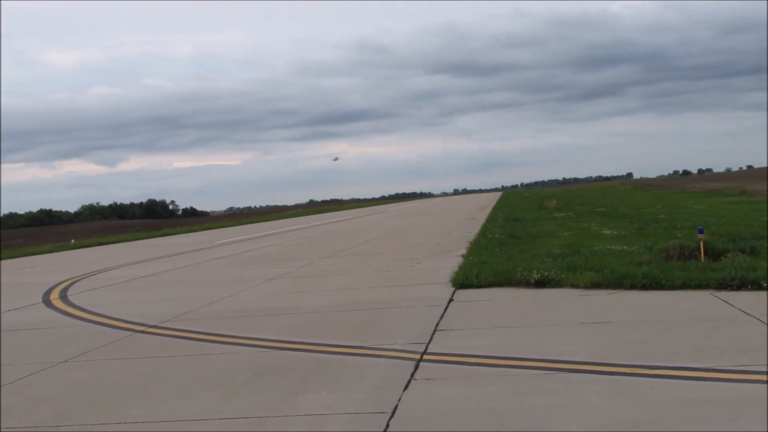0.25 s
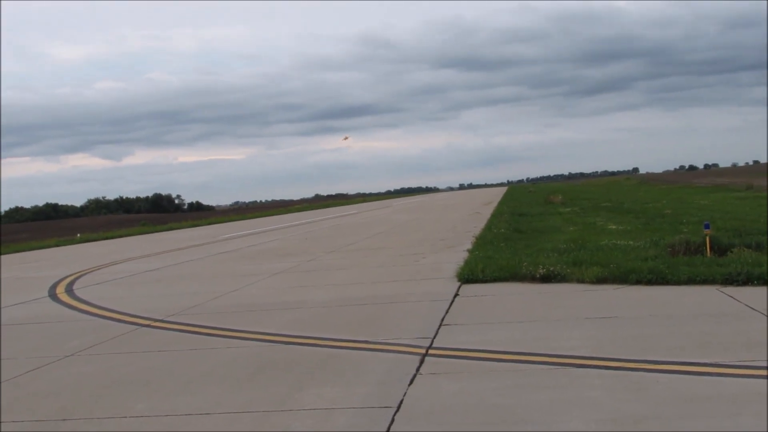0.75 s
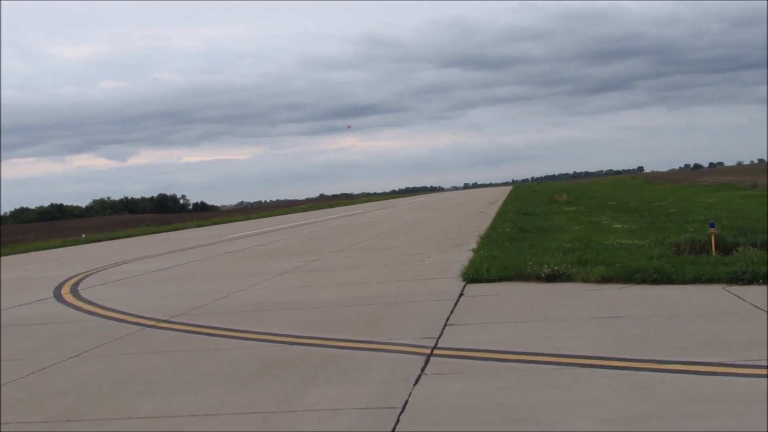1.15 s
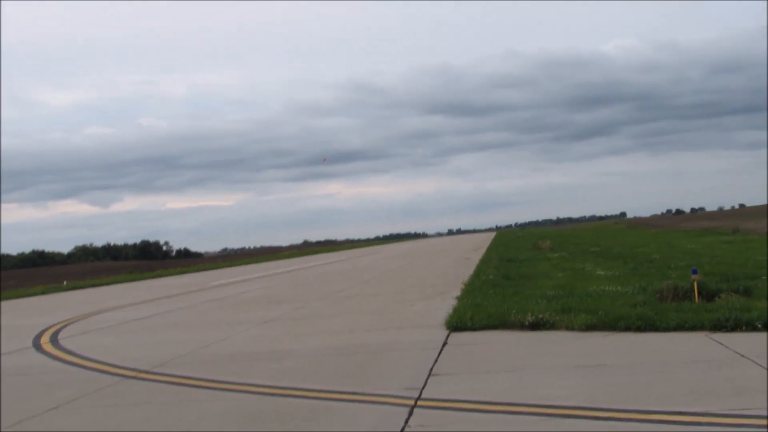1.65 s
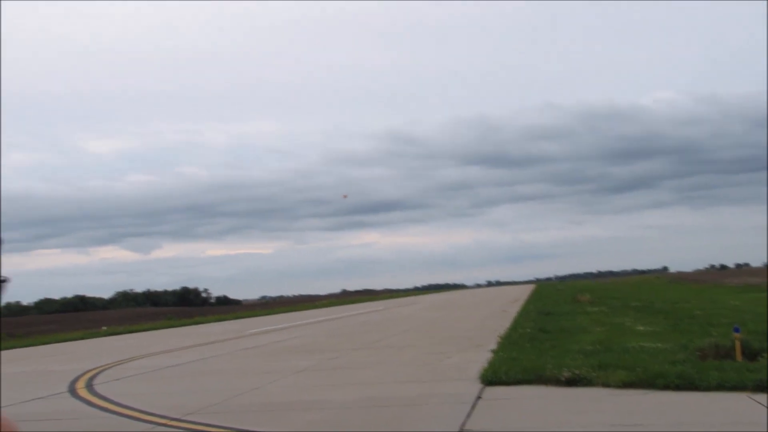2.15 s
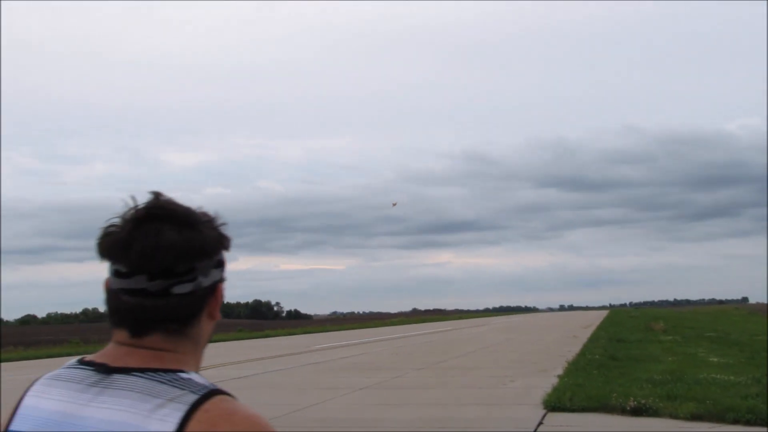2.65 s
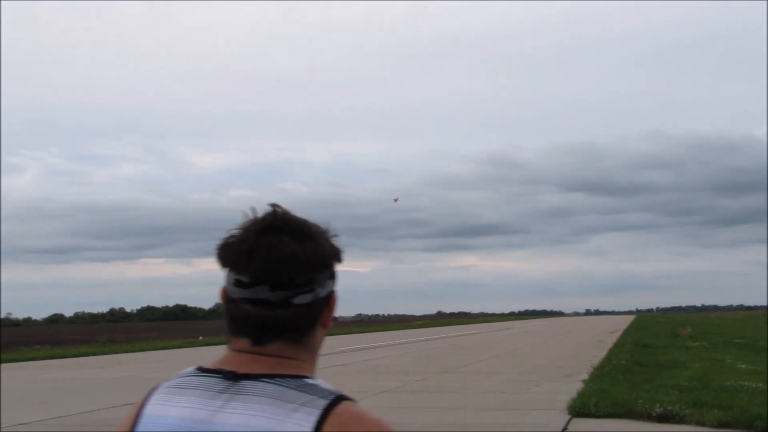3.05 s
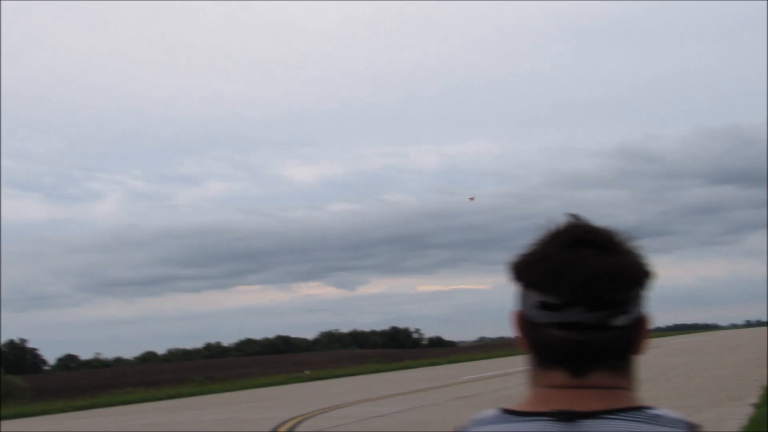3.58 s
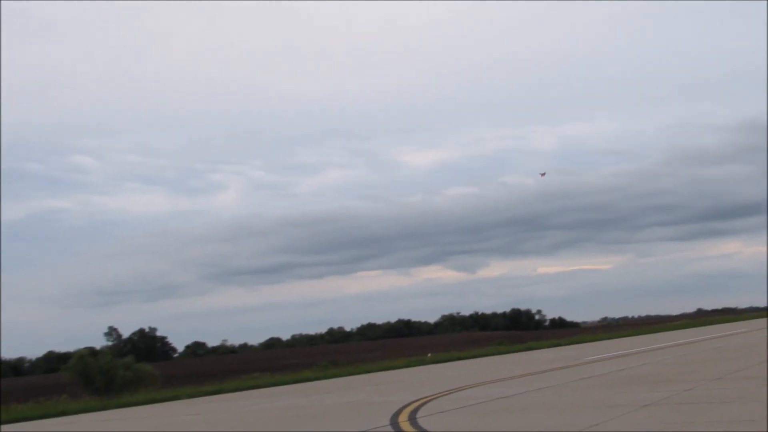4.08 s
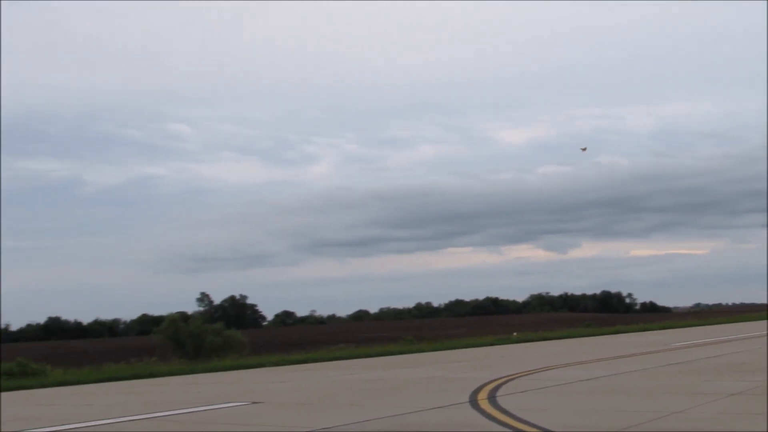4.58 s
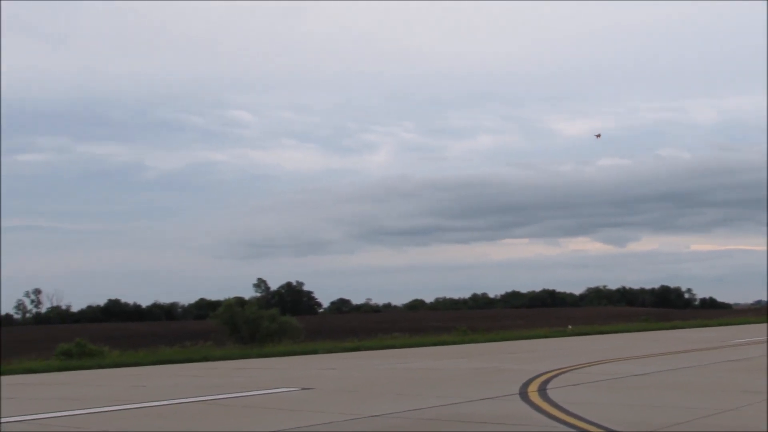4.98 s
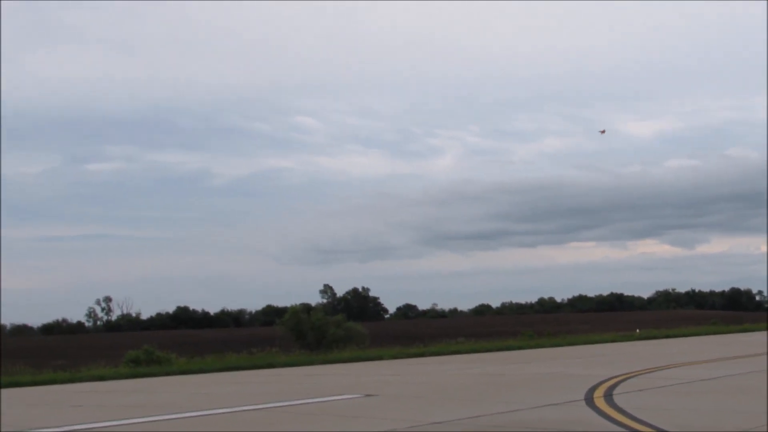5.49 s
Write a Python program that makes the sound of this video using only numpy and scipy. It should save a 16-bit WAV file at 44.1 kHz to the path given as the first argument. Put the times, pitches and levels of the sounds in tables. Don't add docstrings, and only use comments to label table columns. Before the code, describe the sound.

Heavy, clipping wind buffeting nearly covers the hissing roar of a model jet climbing away, with a tiny bird chirping midway.

```python
import sys
import numpy as np
from scipy import signal
from scipy.fft import rfft, irfft, next_fast_len
from scipy.io import wavfile
from scipy.ndimage import uniform_filter1d, map_coordinates

SR = 44100
rng = np.random.default_rng(int(sys.argv[2]) if len(sys.argv) > 2 else 0)


def attenuation_scalar(level_db):
    decades = np.asarray(level_db, float) / 20
    return 10 ** decades


def master_out(mix):
    frames = np.transpose(np.atleast_2d(mix))
    ceiling = np.clip(frames, -1, 1)
    pcm = np.round(ceiling * 32767).astype(np.int16)
    wavfile.write(sys.argv[1], SR, pcm)


N = 252693
T = np.arange(N) / SR
SIZE = next_fast_len(N)
OCTAVE = np.log2(np.maximum(np.fft.rfftfreq(SIZE, 1 / SR), 1))

# (time [s], length [s], first pitch [Hz], last pitch [Hz], level [dB])
CHIRPS = [
    (2.445, 0.019, 4800, 5160, -49),
    (2.5, 0.016, 4200, 3660, -51),
    (2.604, 0.014, 4770, 5330, -55),
    (2.845, 0.046, 7800, 7850, -56),
    (2.89, 0.0085, 7800, 6040, -52),
    (2.913, 0.021, 4940, 5800, -50.5),
    (2.932, 0.013, 6200, 4600, -55),
    (2.95, 0.02, 5370, 4400, -53),
    (3.01, 0.048, 7400, 7700, -56.5),
    (3.056, 0.026, 7540, 6260, -57),
]

# (start [s], hold [s], buffeting [dB], sharpness [dB])
GUSTS = [(0, 0.014, -9, -10.5), (0.087, 0.12, -15.5, -16.5), (0.263, .03, -16, -23),
         (0.372, 0.02, -11, -21.5), (0.479, 0.019, -6.5, -18.5), (0.59, 0.32, -14, -16.5),
         (1.035, 0.017, -11.5, -18), (1.191, 0.059, -8, -18.5), (1.311, 0.11, -16, -8.5),
         (1.497, 0.12, -14, -16), (1.695, 0.0099, -16, -10.5), (1.8, 0.039, -20.5, -22),
         (1.904, 0.039, -18, -17.5), (2.007, 0.023, -16, -24), (2.073, 0.042, -17.5, -13.5),
         (2.162, 0.033, -15, -18), (2.253, 0.018, -17.5, -11), (2.338, 0.095, -13, -18.5),
         (2.509, 0.018, -14, -13.5), (2.607, 0.17, -18, -15), (2.858, 0.004, -16.5, -13),
         (2.93, 0.011, -13, -10), (3.059, 0.069, -18.5, -14.5), (3.173, 0.024, -18.5, -13),
         (3.342, 0.047, -24.5, -4), (3.465, 0.022, -7, -20), (3.535, 0.13, -19.5, -8.5),
         (3.696, .2, -17.5, -12.5), (3.877, 0.013, -15, -13.5), (3.953, 0.36, -15, -12.5),
         (4.454, 0.032, -16, -11), (4.557, 0.022, -24, -14.5), (4.666, 0.027, -17.5, -18.5),
         (4.745, 0.0061, -16, -4), (4.817, 0.056, -16.5, -1), (4.925, 0.031, -13.5, 1.5),
         (5.011, 0.078, -16, -9), (5.213, 0.013, -21, -13.5), (5.305, 0.051, -14, -1.5),
         (5.422, 0.0062, -27.5, 4), (5.455, 0.018, -25.5, -10), (5.518, 0.061, -16, -4),
         (5.654, 0.093, -20, -16)]
# (frequency [Hz], density [dB per Hz])
EDDY_TONE = [(12, -58), (20, -30), (43, -5), (92, 0.5), (160, 0), (265, -6), (422, -11.5), (527, -16.5),
             (684, -37.5), (955, -35.5), (1700, -80), (2210, -70), (3740, -120)]
# (time [s], peak [dB], pitch [Hz], left minus right [dB])
STRONG_EDDIES = [(0.486, -5.5, 170, -3.5), (0.503, -6.0, 120, -1.0), (0.534, -3.0, 301, -4.0),
                 (0.588, -4.5, 162, -3.0), (0.613, -6.5, 141, -1.0), (0.696, -4.0, 230, 0.5),
                 (0.716, -5.5, 171, 0.0), (0.813, -3.5, 197, -0.5), (0.924, -6.5, 194, -4.0),
                 (1.165, -6.5, 129, 2.5), (1.205, -3.0, 143, 2.5), (1.218, -2.0, 212, -3.0),
                 (1.241, -0.5, 236, 2.5), (1.319, -6.0, 244, 3.0), (1.429, -6.5, 171, 3.5),
                 (1.594, -6.0, 159, 3.5), (1.698, -4.5, 157, -3.0), (2.543, 0.5, 169, -2.0),
                 (2.763, -6.5, 179, -2.0), (2.943, -4.0, 218, 0.5), (3.04, -6.5, 137, -3.0),
                 (3.092, -3.0, 179, -0.5), (3.454, -6.0, 132, 0.5), (3.473, -5.0, 213, -3.0),
                 (3.617, -3.0, 215, 2.5), (3.629, -2.0, 152, -1.5), (3.644, -0.5, 241, -2.5),
                 (3.816, -6.5, 149, 1.5), (3.826, -6.0, 181, 0.0), (3.875, -0.5, 195, -2.0),
                 (3.937, -6.5, 191, -0.5), (4.066, -6.0, 177, 1.0), (4.284, -5.5, 177, -3.5),
                 (4.352, -6.0, 221, 4.5), (4.453, -7.0, 235, 1.5), (4.677, -7.0, 124, -0.5),
                 (4.754, -6.0, 201, -3.0), (4.818, -1.5, 165, 0.0), (4.846, -6.0, 209, -1.5),
                 (4.941, -5.5, 332, 1.5), (4.956, -1.5, 251, -2.5), (4.967, -5.5, 219, -1.0),
                 (4.986, -6.5, 251, -1.5), (5.066, -5.5, 207, 0.5), (5.077, -6.5, 200, 3.5),
                 (5.28, -4.5, 293, 1.0), (5.307, -5.0, 300, 2.5), (5.536, -5.0, 141, -1.5),
                 (5.581, 0.5, 154, 1.0), (5.614, -5.5, 168, -1.0)]
# (time [s], peak [dB], pitch [Hz])
LESSER_EDDIES = [(0.114, -8.0, 147), (0.157, -9.0, 139), (0.184, -9.5, 254), (0.212, -10.5, 142),
                 (0.361, -9.5, 156), (0.384, -7.0, 175), (0.473, -7.0, 214), (0.543, -8.5, 196),
                 (0.627, -7.0, 154), (0.802, -8.5, 145), (0.834, -7.5, 130), (0.898, -8.5, 153),
                 (0.94, -9.0, 149), (0.958, -10.0, 173), (0.97, -10.5, 155), (1.043, -7.5, 174),
                 (1.228, -7.5, 182), (1.299, -7.0, 145), (1.535, -7.5, 209), (1.571, -7.0, 216),
                 (1.583, -8.0, 154), (1.61, -7.0, 272), (1.68, -8.5, 170), (1.906, -11.5, 213),
                 (2.091, -9.0, 192), (2.159, -10.5, 229), (2.251, -11.5, 260), (2.267, -9.5, 202),
                 (2.279, -11.5, 226), (2.34, -8.0, 211), (2.438, -8.0, 163), (2.459, -7.5, 160),
                 (2.562, -8.0, 214), (2.849, -9.0, 167), (2.862, -10.5, 352), (3.122, -10.5, 205),
                 (3.205, -10.0, 205), (3.345, -11.5, 152), (3.412, -11.5, 198), (3.484, -7.5, 158),
                 (3.498, -7.5, 168), (3.594, -8.0, 171), (3.687, -8.5, 211), (3.778, -8.0, 191),
                 (3.802, -7.5, 249), (3.841, -8.5, 191), (3.959, -8.5, 175), (4.023, -9.0, 173),
                 (4.184, -8.0, 194), (4.228, -7.5, 292), (4.492, -7.0, 155), (4.742, -9.0, 234),
                 (4.799, -7.0, 180), (4.836, -7.5, 179), (4.904, -9.0, 208), (5.257, -7.0, 159),
                 (5.32, -7.5, 176), (5.345, -8.5, 192), (5.418, -9.0, 250), (5.555, -7.5, 144)]
# (time [s], peak [dB], pitch [Hz])
SHARED_EDDIES = [(0.021, -20.5, 252), (0.215, -21.0, 201), (0.392, -20.5, 195), (0.468, -20.5, 221),
                 (0.486, -17.0, 120), (0.498, -19.5, 146), (0.521, -20.5, 146), (0.534, -15.0, 360),
                 (0.587, -20.0, 125), (0.601, -19.5, 166), (0.711, -20.0, 310), (0.777, -21.0, 148),
                 (0.814, -20.5, 233), (0.899, -21.5, 141), (0.924, -19.5, 182), (0.94, -20.5, 140),
                 (1.029, -18.0, 141), (1.206, -19.0, 158), (1.219, -16.5, 235), (1.241, -16.0, 228),
                 (1.3, -20.0, 162), (1.317, -15.5, 218), (1.422, -20.0, 224), (1.594, -18.0, 139),
                 (1.608, -21.0, 276), (1.681, -20.0, 184), (1.698, -19.0, 258), (2.544, -17.0, 146),
                 (2.86, -17.5, 171), (2.94, -21.0, 163), (3.039, -21.0, 146), (3.453, -19.5, 149),
                 (3.473, -15.5, 162), (3.487, -16.5, 183), (3.567, -19.5, 124), (3.598, -17.5, 170),
                 (3.616, -17.0, 234), (3.644, -16.5, 206), (3.728, -21.0, 120), (3.875, -18.5, 211),
                 (4.088, -19.5, 158), (4.233, -21.0, 227), (4.286, -19.5, 152), (4.351, -16.5, 191),
                 (4.754, -21.0, 249), (4.794, -21.5, 206), (4.822, -13.0, 201), (4.853, -19.0, 208),
                 (4.942, -15.5, 160), (4.956, -17.5, 369), (4.969, -18.0, 255), (5.077, -20.5, 218),
                 (5.278, -19.0, 256), (5.289, -21.0, 266), (5.307, -18.0, 175), (5.322, -20.0, 140),
                 (5.528, -14.0, 205), (5.572, -20.0, 147), (5.586, -19.5, 151), (5.615, -21.0, 186)]
# (time [s], peak [dB], pitch [Hz])
SNAPS = [
    (1.424, -42, 930),
    (3.975, -35, 880),
    (4.823, -30.5, 890),
    (4.857, -33, 1330),
    (5.29, -36, 1090),
    (5.533, -32, 895),
    (5.579, -31.5, 1170),
]
WIDEN_DB = 11.5
RISE_DB_PER_S, FALL_DB_PER_S, LULL_DB, LULL_SHARP_DB = 252, 160, -27, -42
FLICK_PAN_DB = 6
LEAN_SHARE = 0.46
SHARED_DB, SHARED_CALM = -2, 6.9
WAKE, WAKE_S = 5.6, 0.013

# (time [s], roar [dB], top treble lost to distance and bearing [dB])
FLIGHT = [(0, -40.5, 3), (.3, -42, 1.5), (.55, -42, 5), (.8, -45.5, 7.5), (1.3, -46, 14),
          (1.6, -47.5, 12.5), (1.85, -50, 8.5), (2.15, -49.5, 5.5), (2.5, -47.5, 2), (2.72, -50, 4.5),
          (3.15, -48, 8), (3.45, -44.5, 24), (3.95, -53, 18), (4.35, -45.5, 29), (4.85, -45, 31.5),
          (5.03, -49, 22), (5.38, -48.5, 26.5), (5.73, -48.5, 27.5)]
# (time [s], lag [ms], strength [dB])
RUNWAY_ECHO = [(0.0, 0.68, -10), (0.5, 0.71, 1.5), (0.88, 0.85, 1.5), (1.07, 0.93, 0), (1.3, 1.02, 1.5),
               (1.5, 1.11, 0.5), (1.76, 1.096, 0.5), (2.2, 1.19, 1.5), (2.45, 1.205, 2), (2.7, 1.26, -1.5),
               (3.09, 1.31, -2.5), (3.53, 1.428, 2.4), (3.97, 1.42, -3.5), (4.41, 1.35, -1.5),
               (4.85, 1.43, -1.5), (5.15, 1.54, -6.5), (5.73, 1.71, -5.5)]
# (time [s], pitch [Hz], level over roar [dB])
BLADE_WHISTLE = [(0, 14980, -33), (.1, 14960, -34), (.21, 14830, -34), (.33, 14500, -33), (.47, 14080, -33),
                 (.6, 13920, -38), (.8, 13750, -39), (1.1, 13690, -37), (1.5, 13680, -34),
                 (2.5, 13670, -35), (3.3, 13700, -43), (3.8, 13700, -70)]
# (frequency [Hz], density [dB per Hz])
ROAR_TONE = [(60, -41.0), (250, 5.5)] + [(350, -34), (600, -1.5), (687, -13.5), (765, -2.5), (1000, -4.0),
             (1280, 3.0), (1540, -2.5), (1740, 1.5), (1985, -2.0), (2400, -5.0), (3100, -7.5), (3480, -18),
             (4100, -16.5), (4600, -21.0), (5610, -18.5), (6600, -23.0), (7800, -26), (9200, -28.0),
             (10200, -34), (10800, -37), (15000, -52.0)][1:]
# (frequency [Hz], side over mid [dB])
ROAR_WIDTH = [(200, -26), (800, -16), (1500, -15.5), (1750, -19.5), (2400, -13.5), (4400, -12.5),
              (8000, -9.5), (15000, -4)]
# (time [s], half length [s], level [dB])
STILL_AIR = [(0.082, 0.15, 3), (1.11, 0.063, 0.5), (1.42, 0.33, 6), (2.263, 0.013, 4), (2.696, 0.048, 3),
             (2.905, 0.039, 0), (3.1, 0.031, 3), (3.53, 0.066, 6.5), (3.813, 0.075, 8.5), (4.393, 0.2, 7.5),
             (4.942, 0.033, 11), (4.165, 0.092, 3.5), (5.253, 0.085, 2), (5.432, 0.02, 7.5),
             (5.561, 0.0087, 6.5)]
# (time [s], takes [s], change [dB])
NOZZLE_TURNS = [
    (1.25, .2, 1.5),
    (3.2, 0.16, -1.5),
    (4.15, 0.092, -12),
    (4.85, 0.1, 7),
]
# (from [s], to [s], pitch [Hz], width [octaves], change [dB])
ROAR_TINTS = [
    (0.1, .55, 5700, 0.059, 2.5),
    (1.28, 2, 2380, 0.038, -9),
    (1.28, 1.2, 3550, .04, -7),
    (1, 1.2, 12000, .2, 3.5),
    (2.5, 4.98, 2600, 0.34, 3.),
    (3.2, 3.7, 1330, .12, 1.5),
    (4, 4.3, 3240, 0.059, 4.5),
    (-1, 3.8, 2100, 0.041, 4),
    (5, 5.8, 1970, .06, 5),
]
# (time [s], change [dB], recovery [s])
DUCKS = [
    (.56, -3, 0.36),
    (1.236, -9, 0.75),
    (3.65, -2, 1),
    (5.6, -9, 0.27),
]
DUCK_S = 0.015
BODY_MS, BODY_DB = 0.99, -20
HISS_DB, HISS_SHARE = -4, 0.47
LOW_DB, LOW_SHARE = 3.5, 0.21
ECHO_DB, OVER_GRASS_DB, OVER_GRASS_S = -4., -6., .8
REAR_HZ, REAR_OCTAVES, REAR_S, REAR_TAKES_S, REAR_DB = 2048, .15, 4.83, 0.44, 4.5
TINT_TAKES_S = 0.062

# (frequency [Hz], level over mean hiss [dB])
DROPOUT_FLOOR = [(1000, -6), (3000, -2.5), (6000, -3), (9000, -9.5), (10200, -9.5), (10700, -17.5),
                 (11400, -11), (12100, -11), (16000, -13)]
SCAN_HZ, SCAN_DB = 15735, -98


def ramp(x):
    return np.clip(x, 0, 1)


def bell(x):
    return np.exp(-.5 * x ** 2)


def colour(x, points):
    hz, db = np.transpose(points)
    return irfft(rfft(x, SIZE) * attenuation_scalar(np.interp(OCTAVE, np.log2(hz), db)), SIZE)[:N]


def curves(table):
    s, *columns = np.transpose(table)
    return [np.interp(T, s, c) for c in columns]


def unit(x):
    return x / np.sqrt(np.mean(x ** 2))


def walk(rate):
    k = int(SR / rate)
    held = np.repeat(rng.standard_normal(N // 100), k)[:N]
    return unit(uniform_filter1d(uniform_filter1d(held, k), k))


def split(x, hz):
    low = signal.sosfiltfilt(signal.butter(2, hz, fs=SR, output="sos"), x)
    return low, x - low


def delay(x, ms):
    return map_coordinates(x, [np.arange(N) - ms * SR / 1000], order=3, mode="wrap")


def scan_whine():
    level_db = SCAN_DB - 6 * ramp(4.2 - T) + 3 * walk(12)
    return attenuation_scalar(level_db) * np.sin(2 * np.pi * SCAN_HZ * T)


def bird(lean=0.48):
    out = np.zeros(N)
    for s, length, first_hz, last_hz, db in CHIRPS:
        t = np.arange(int(length * SR)) / SR
        warble_hz = 150 * np.sin(2 * np.pi * 90 * t)
        hz = first_hz + (last_hz - first_hz) * t / length + warble_hz
        tone = np.sin(2 * np.pi * np.cumsum(hz) / SR)
        out[int(s * SR):][:len(t)] += attenuation_scalar(db - 0.5) * np.hanning(len(t)) ** .5 * tone
    return out * np.array([[1], [lean]])


def gusts():
    power = attenuation_scalar(LULL_DB) ** 2
    sharp = power * LULL_SHARP_DB
    for s, hold, db, sharp_db in GUSTS:
        rise_db = RISE_DB_PER_S * np.maximum(s - T, 0)
        fall_db = FALL_DB_PER_S * np.maximum(T - s - hold, 0)
        push = attenuation_scalar(db - rise_db - fall_db) ** 2
        power = power + push
        sharp = sharp + push * sharp_db
    return 10 * np.log10(power), sharp / power


def port_flutter(sharp_db):
    low, high = split(unit(colour(rng.standard_normal(N), EDDY_TONE)), 210.0)
    deep, low = split(low, 98.0)
    high, spit = split(high, 483.0)
    spit = spit * attenuation_scalar(8.5 * np.tanh(0.84 * walk(170)) - 6.0)
    clump_db = 6 * np.tanh((1.0 * walk(35) + 4.6 * walk(90)) / 6)
    sharp = attenuation_scalar(1.48 * (sharp_db + 13.0) + 3.19 * clump_db - 0.5)
    large = attenuation_scalar(0.072 * clump_db) * deep + attenuation_scalar(clump_db - 3.0) * low
    return large + split(sharp * high, 565.0)[0] + sharp * spit


def buffet():
    gust_db, sharp_db = gusts()
    left, right = [attenuation_scalar(port_db) * port_flutter(sharp_db) for port_db in (-1.4, 0.)]
    wind = np.array([attenuation_scalar(-WIDEN_DB - 0.5) * (left + right), left - right]) * attenuation_scalar(gust_db - 6.5)
    size = uniform_filter1d(abs(signal.hilbert(wind[1], SIZE)[:N]), size=200)
    both = uniform_filter1d(abs(wind[0]), size=300)
    wind = wind / np.array([1 + (both / 0.071) ** 2, np.ones(N)])
    return wind / (1 + (size / 0.29) ** 4) ** 0.34


def thumps(cycles=0.42):
    out = np.zeros((2, N))
    luck = 2 * rng.random(len(LESSER_EDDIES)) - 1
    lesser = [(s, db, hz, FLICK_PAN_DB * b) for (s, db, hz), b in zip(LESSER_EDDIES, luck)]
    snaps = [(s, db + 12, hz, -8.) for s, db, hz in SNAPS]
    rows = list(STRONG_EDDIES) + snaps + lesser
    t = np.arange(-1200, 1200) / SR
    for (s, db, hz, pan_db), turn in zip(rows, rng.random((len(rows), 1))):
        size = attenuation_scalar(min(db - .5, -.5))
        pulse = size * bell(t * hz / cycles) * np.cos(2 * np.pi * (hz * t + turn))
        lean = (attenuation_scalar(pan_db) - 1) / (attenuation_scalar(pan_db) + 1)
        mid_share = lean * (1 if hz > 800 else LEAN_SHARE)
        at = int(s * SR) - len(t) // 2
        out[:, at:at + len(t)] += pulse * np.array([[mid_share], [1]])
    for (s, db, hz), turn in zip(SHARED_EDDIES, rng.random(len(SHARED_EDDIES))):
        at = max(int(s * SR) - len(t) // 2, 0)
        pulse = bell(t * hz / (1.1 * cycles)) * np.cos(2 * np.pi * (hz * t + turn))
        out[0, at:at + len(t)] += attenuation_scalar(db + SHARED_DB) * pulse
    return out


def flight():
    roar_db, loss_db = curves(FLIGHT)
    clear_db = sum(db * bell((T - s) / half) for s, half, db in STILL_AIR)
    duck_db = sum(db * ramp((T - s) / DUCK_S) * np.exp(-np.maximum(T - s, 0) / back) for s, db, back in DUCKS)
    turn_db = sum(db * ramp((T - s) / takes) for s, takes, db in NOZZLE_TURNS)
    low_db = LOW_DB + turn_db + LOW_SHARE * clear_db
    return roar_db + duck_db, HISS_DB - HISS_SHARE * loss_db + clear_db, clear_db - loss_db, low_db


def runway_echo(roar):
    lag_ms, strength_db = curves(RUNWAY_ECHO)
    echo_db = ECHO_DB + strength_db + OVER_GRASS_DB * np.exp(-T / OVER_GRASS_S)
    low, high = split(roar, 3500.)
    echo = delay(low, lag_ms + .012 * walk(6))
    echo = echo + attenuation_scalar(-11 + 3 * walk(5)) * delay(high, lag_ms + .045 * walk(4))
    return attenuation_scalar(np.minimum(echo_db, 0)) * echo


def through_air(pair, hiss_db, top_db, low_db):
    spectra = rfft(pair, SIZE)
    rear_db = REAR_DB * ramp((T - REAR_S) / REAR_TAKES_S)
    out, shared = 0, walk(5.8)
    for centre in np.arange(7, 14.1, .5):
        band = irfft(spectra * ramp(1 - 2 * abs(OCTAVE - centre)), SIZE)[:, :N]
        to_hiss = ramp((centre - np.log2(3100)) / .5)
        to_top = ramp((centre - np.log2(5800)) / 1.6)
        to_low = ramp((np.log2(2000) - centre) / 1.92)
        air_db = to_hiss * (1 - to_top) * (hiss_db + 11.5) + to_top * (top_db + 18.0)
        air_db = air_db + (low_db + 2.0) * to_low
        air_db = air_db + rear_db * bell((centre - np.log2(REAR_HZ)) / REAR_OCTAVES)
        waver_db = (.5 + .85 * to_top) * shared + (.8 + .4 * to_hiss + 1.4 * to_top) * walk(16)
        out = out + band * attenuation_scalar(air_db + waver_db)
    return out


def roar_tints(roar):
    heard = rfft(roar, SIZE)
    change = np.zeros(N)
    for start, end, hz, octaves, db in ROAR_TINTS:
        near = irfft(heard * bell((OCTAVE - np.log2(hz)) / octaves), SIZE)[:N]
        present = ramp(np.minimum(T - start, end - T) / TINT_TAKES_S + .5)
        change += (attenuation_scalar(db) - 1) * present * near
    return change


def blade_whistle():
    hz, whistle_db = curves(BLADE_WHISTLE)
    level = attenuation_scalar(whistle_db - 2.5 + 1.5 * walk(60))
    return level * np.sin(2 * np.pi * np.cumsum(hz + 22 * walk(120)) / SR)


def jet():
    roar_db, hiss_db, top_db, low_db = flight()
    mid, side = rng.standard_normal((2, N))
    mid = mid + runway_echo(mid)
    mid = mid + attenuation_scalar(BODY_DB) * np.roll(mid, int(BODY_MS * SR / 1000))
    pair = np.array([colour(mid, ROAR_TONE), colour(colour(side, ROAR_TONE), ROAR_WIDTH)])
    out = through_air(pair / np.std(pair[0]), hiss_db, top_db, low_db)
    out[0] += roar_tints(out[0])
    out[0] += blade_whistle()
    return out * attenuation_scalar(roar_db + 5.5)


def scene():
    strong = thumps()
    near_eddy = uniform_filter1d(abs(strong), size=250)
    calm = ramp(1 - np.array([[SHARED_CALM], [1.5]]) * near_eddy)
    k = int(WAKE_S * SR)
    wake = 1 + WAKE * uniform_filter1d(uniform_filter1d(abs(strong[1]), k), k)
    mid, side = jet() + calm * wake * buffet() + strong + bird()
    return np.array([mid + side, mid - side])


def band_dropouts(dry, margin_db=8., load=.25, chance_db=3.2, side_db=3.):
    pair = np.array([dry[0] + dry[1], dry[0] - dry[1]])
    pair = np.pad(pair, ((0, 0), (0, 400)), mode="reflect") / 2
    hz, _, z = signal.stft(pair, SR, "cosine", nperseg=512, boundary="even")
    hz = hz[:255, None]
    db = 10 * np.log10((abs(z[:, :255]) ** 2).reshape(2, 255, 165, 6).mean(axis=3) + 1e-14)
    wind_db = db[1, :6].max(axis=0)
    hiss_db = db[0, 54:108].mean(axis=0)
    floor_db = np.interp(hz, *np.transpose(DROPOUT_FLOOR)) + hiss_db + load * (wind_db - wind_db.mean())
    mask_db = uniform_filter1d(db[0], size=21, axis=0) - margin_db
    luck = rng.standard_normal(db.shape)
    luck_db = chance_db * (luck + .6 * np.roll(luck, 1, axis=2) + .8 * np.roll(luck, 1, axis=1)) / 1.2
    luck_db[1] += side_db + 3.0 * rng.standard_normal(db.shape[2])
    luck_db[0] += 2.2 * ramp(hz / 3000 - 2.6) * rng.standard_normal(db.shape[2])
    keep = db + luck_db > np.maximum(floor_db, mask_db)
    keep[0, 160:] = uniform_filter1d(1. * keep[0, 160:], size=3, axis=0) > 0
    keep[:, :24] = True
    tone_hz = np.interp((np.arange(165) + .5) * 6 * 256 / SR, *np.transpose(BLADE_WHISTLE)[:2])
    keep[0] |= abs(hz - tone_hz) < 110 * (np.arange(165) < 104)
    keep &= hz < tone_hz + 250
    keep[0, 120:, :13] |= (luck[0, 120:, :13] > -.5) & (hz[120:] < tone_hz[:13])
    z[:, :255] *= keep.repeat(6, axis=2)
    mid, side = signal.istft(z, SR, "cosine", nperseg=512)[1][:, :N]
    return np.array([mid + side, mid - side])


def band_limit(x):
    return signal.sosfilt(signal.butter(12, 15780, fs=SR, output="sos"), x)


def record(dry):
    fade = ramp(np.minimum(np.arange(N), np.arange(N)[::-1]) / 150)
    whine = scan_whine()
    mix = fade * (band_dropouts(np.clip(dry, -1, 1)) + whine)
    return band_limit(mix)


dry = scene()
out = record(dry)
master_out(out)
```